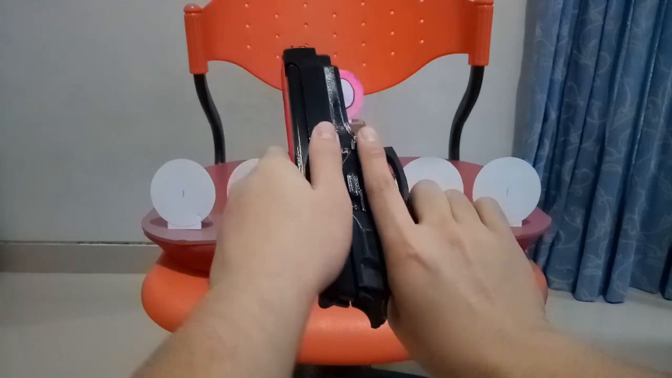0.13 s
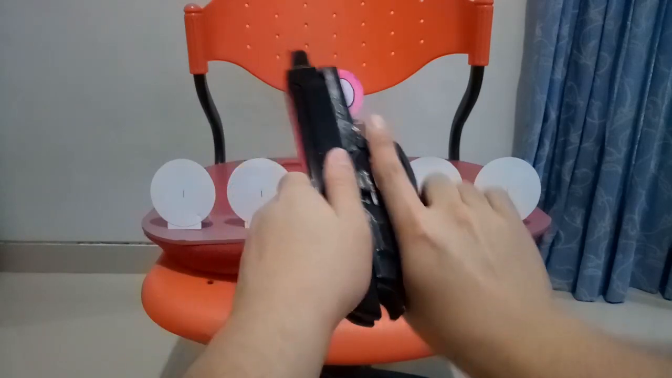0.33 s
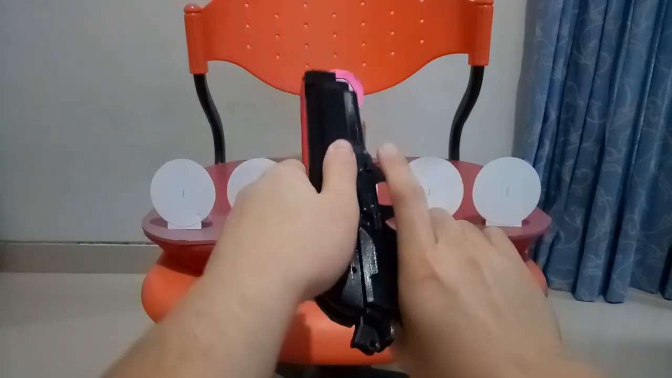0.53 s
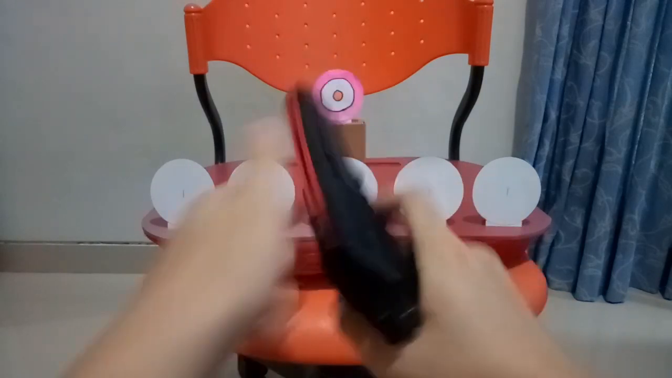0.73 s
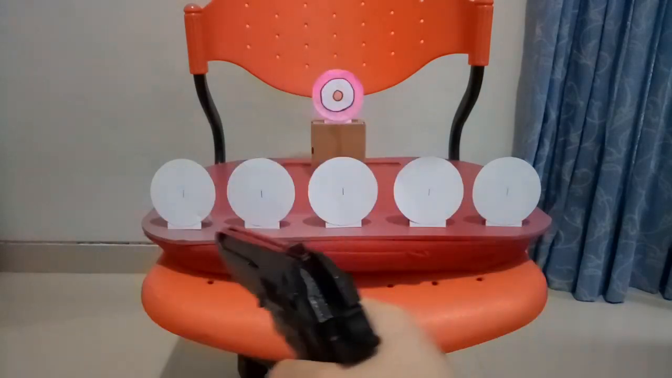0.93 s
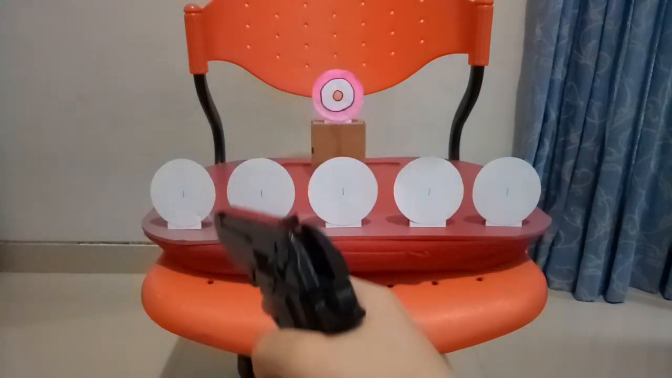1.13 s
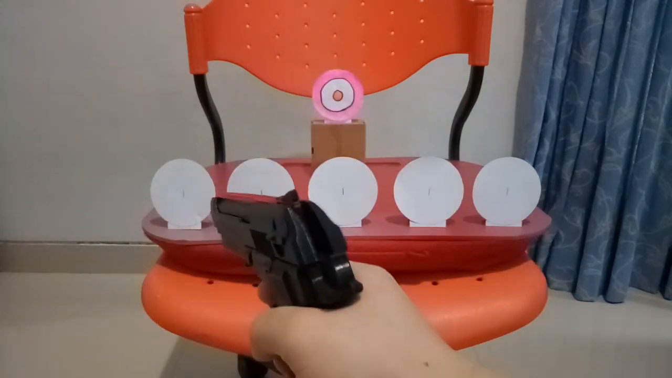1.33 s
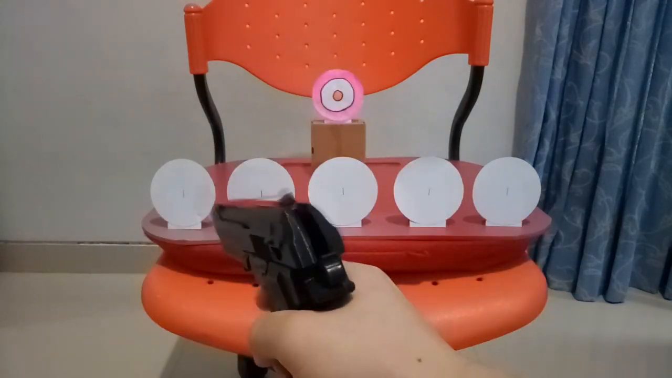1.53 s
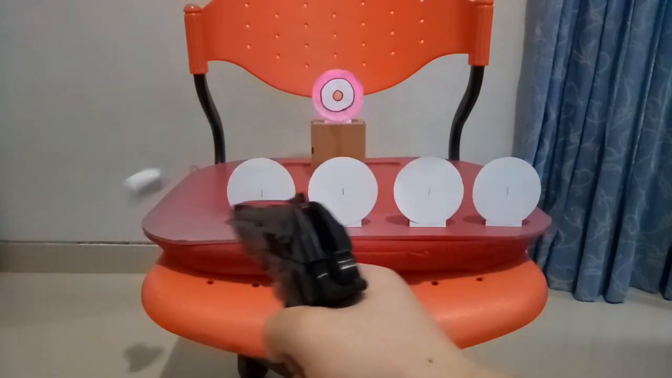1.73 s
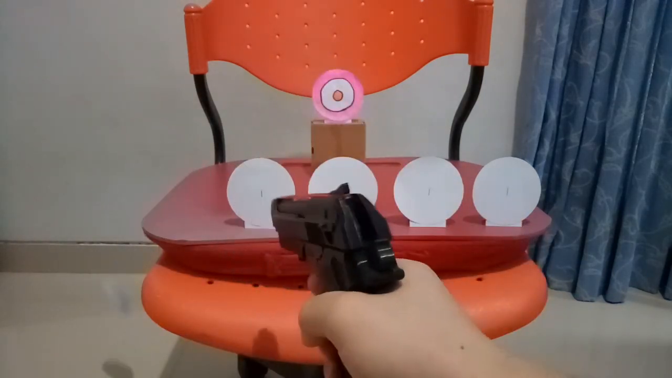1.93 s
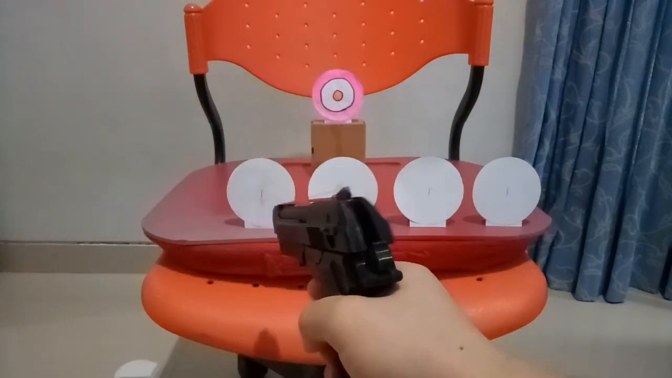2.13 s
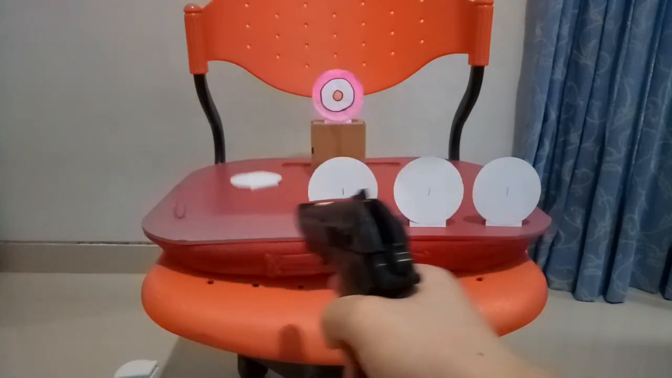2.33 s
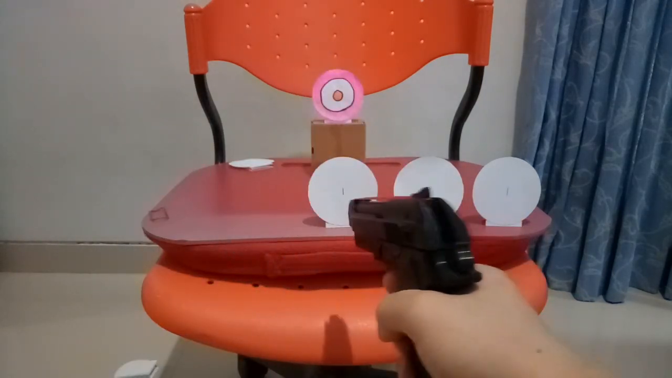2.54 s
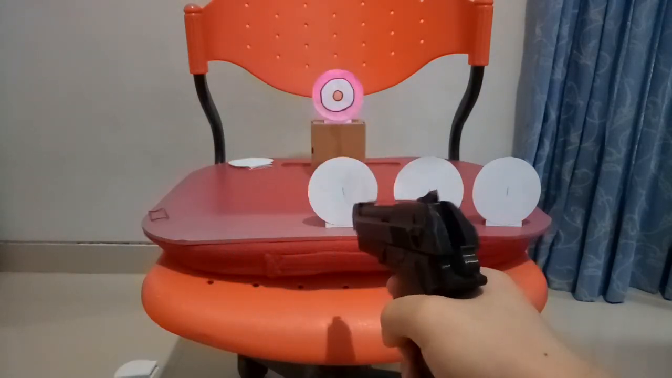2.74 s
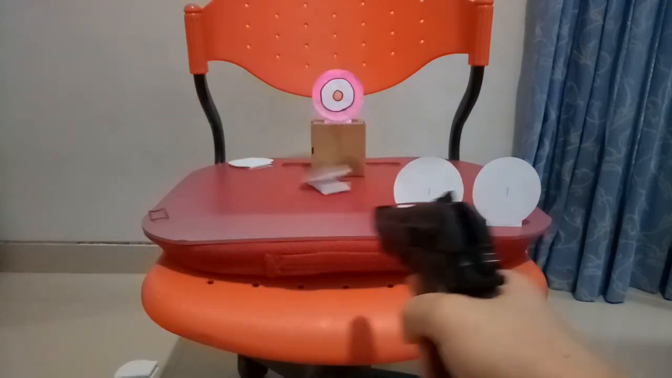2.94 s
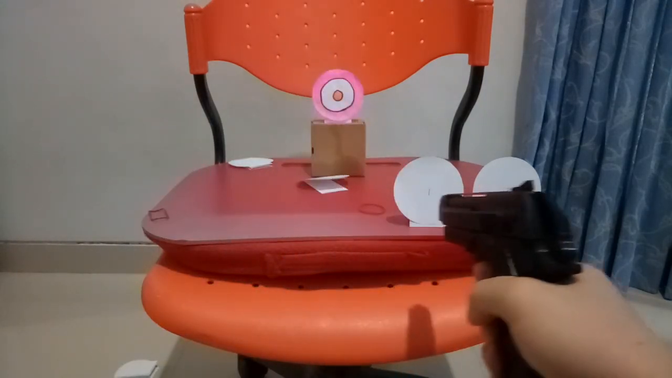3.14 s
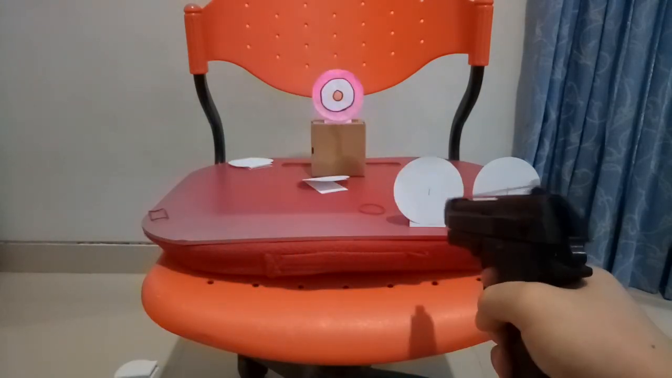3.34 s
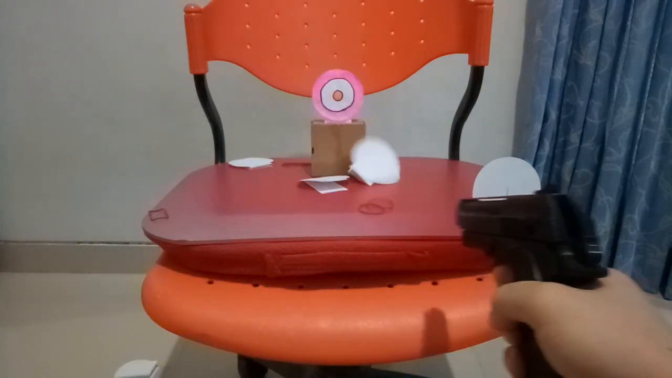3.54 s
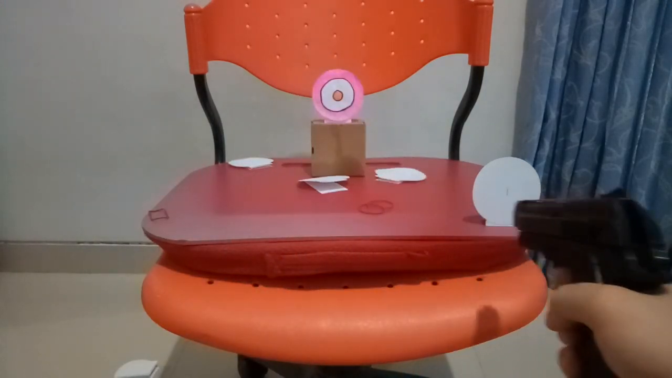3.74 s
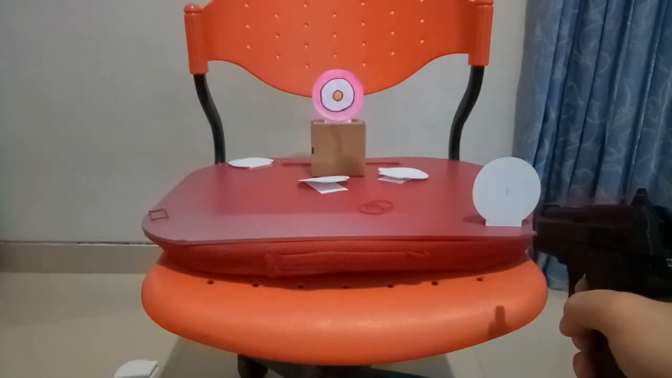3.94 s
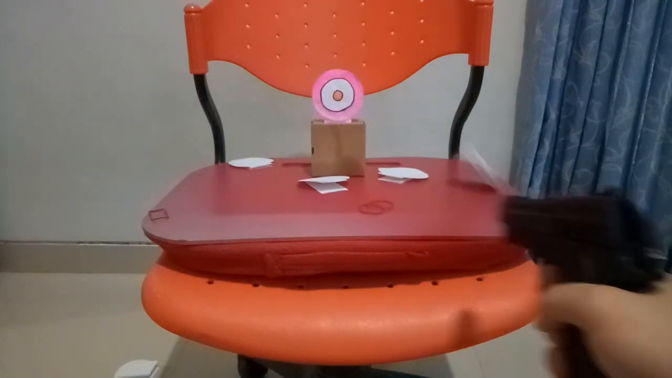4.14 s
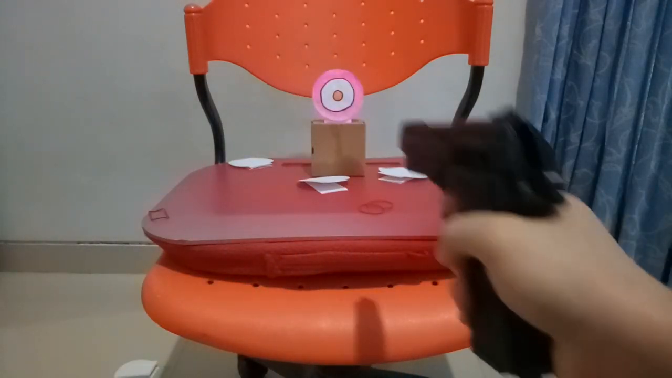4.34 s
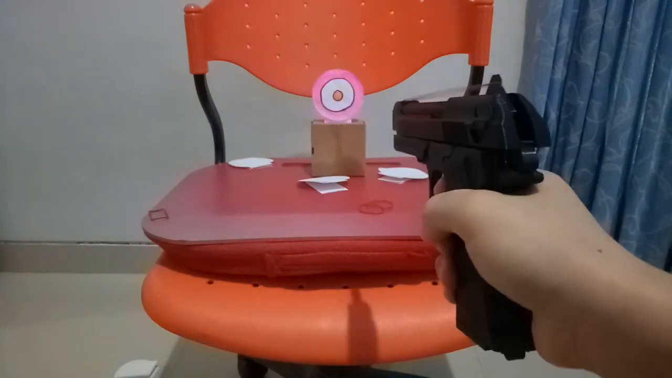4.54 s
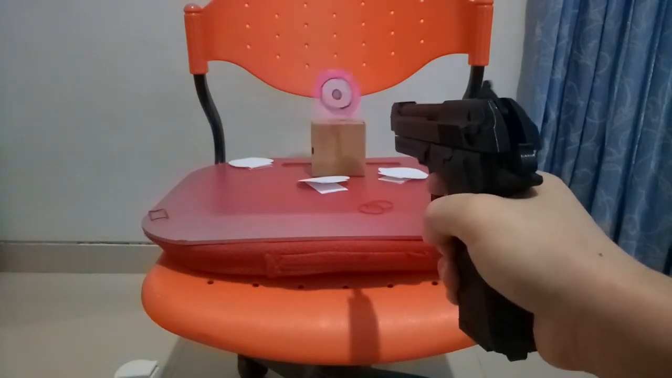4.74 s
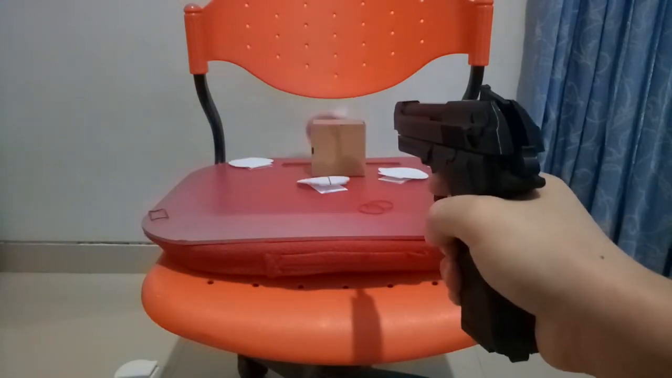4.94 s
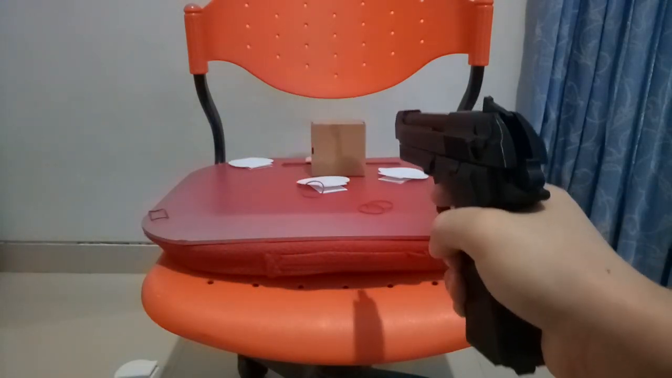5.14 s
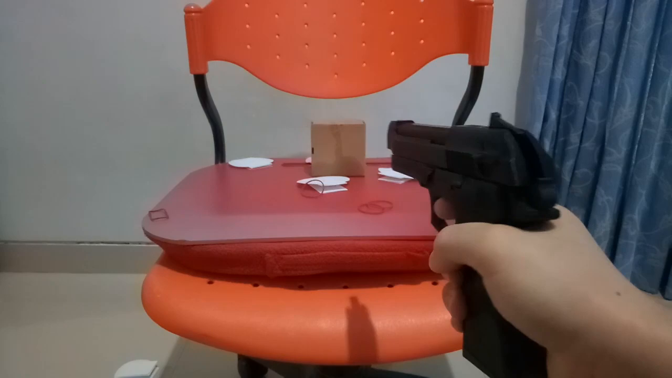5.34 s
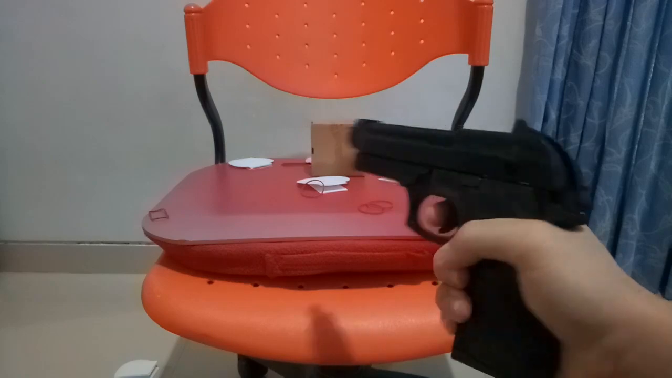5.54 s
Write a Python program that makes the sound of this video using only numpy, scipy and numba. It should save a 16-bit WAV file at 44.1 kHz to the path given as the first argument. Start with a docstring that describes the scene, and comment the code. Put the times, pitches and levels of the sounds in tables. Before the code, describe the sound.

A hollow plastic toy pistol is cocked with a double clack, then fired six times, each sharp snap answered by a return click and raspy echo.

```python
"""Toy pistol and card targets

A hollow plastic pistol is cocked, then fired six times close to a phone in a bare tiled room; the trigger clacks
back after each shot and light card targets land. Blows are damped modes plus a crack, each with a diffuse room tail;
puffs are decaying swings; creaks, squeaks, scrapes, rumble and room background are coloured noise.
The phone's gain control ducks under loud clacks, then lets go, so that the echo stands out as a rasp."""
import sys
import numpy as np
from scipy import signal
from scipy.fft import rfft, irfft, next_fast_len
from scipy.io import wavfile
from scipy.ndimage import uniform_filter1d, map_coordinates
from numba import njit

SR = 44100
rng = np.random.default_rng(int(sys.argv[2]) if len(sys.argv) > 2 else 0)


def unload_wav(signal):
    """Save mono or channel-first audio to the path in sys.argv[1] as 16-bit WAV at rate SR, clipped to [-1, 1]."""
    wavfile.write(
        sys.argv[1],
        SR,
        np.round(np.clip(np.atleast_2d(signal).T, -1, 1) * 32767).astype(np.int16),
    )


def decibels_to_gain(level_db):
    """Convert a level in decibels to a linear amplitude gain (20 dB per decade)."""
    exponent = np.asarray(level_db, float) / 20
    return 10 ** exponent


N = 246078  # length of the scene in samples
SIZE = 2 ** 15  # length of one blow with its room tail in samples

# Blows of the pistol: slide back and home, shots, trigger springing back, small catches in the mechanism.
# Each row: start in seconds, nominal energy level in dB, treble in dB, second knock in dB re the first, room in dB
# re the blow.
COCKING = [(.3996, 16, 1, -25, -4.5), (.5768, 28.5, -9, -1, -15)]
SHOTS = [(1.5423, 26.5, 1, -28, -6.5), (2.1449, 25.5, 5, -19.5, -5), (2.7473, 31.5, 0, -32, -11),
         (3.3649, 25, 4, -14, -8.5), (3.9982, 25.5, 2.5, -29.5, -7), (4.6320, 28.5, 1, -28, -10)]
TRIGGER_RETURNS = [(1.6787, 17, 6.2, -23, -4.5), (2.2813, 17.5, 8, -30, -4.5),
                   (2.8839, 24, 4.5, -33, -12.5), (3.5090, 23.5, 2.9, -3, -8), (4.1381, 21, 6, 0, -7.5),
                   (4.8136, 25.5, 4.7, -19, -13)]
CATCHES = [(.3737, -7, -16, -14, -4), (.5740, 10, 0, -13, -14), (1.2641, -24, -22, -12, -9),
           (2.907, 2, -8, -14, -14), (3.3254, -27, -19, -12, -8), (4.6090, -29, 6, -12, -10)]
# Card targets landing, each on its own face or edge. Each row: the five columns above, then the spectral slope
# below 4 kHz in dB per octave.
TARGET_FALLS = [(3.0024, -12.5, -10, -12, -12, 0), (3.1182, -7, -6, -5, -1, -1.2),
                (3.6510, -16.5, -8.5, -10, -9.5, -.4), (4.8558, 6.5, -20, -5, -9, -1.6),
                (5.1153, 3.5, -5, -14, -2, 3.6), (5.1276, 3, 10, -14, -8, 7),
                (5.2777, -30, -12, -10, -10, 3)]
# The same slope for the four kinds of pistol blow, in dB per octave.
COCKING_SLOPE_DB, SHOT_SLOPE_DB, RETURN_SLOPE_DB, CATCH_SLOPE_DB = 5.5, 7.5, 3.5, 2.5
# Puffs of air that reach the microphones. Each row: start in seconds, nominal level in dB.
PUFFS = [(0.576, -30), (1.5424, -31), (2.1454, -9.5), (2.7475, -2), (4.631, -30.5)]
# Modes of the plastic shell and of the card. Each row: nominal frequency in Hz, nominal level in dB,
# 60 dB decay time in seconds.
PLASTIC_MODES = [(1000, -25, .009), (1600, -19, .009), (2450, -11, .012), (3150, -8, .011),
                 (3660, -1, .016), (4300, -5, .011), (4780, -2, .014), (5550, -6, .011), (6100, -8, .011)]
CARD_MODES = [(900, -15, .016), (1500, -14, .01), (2450, -5, .012), (3200, -4, .011), (3800, 0, .013),
              (4600, -4, .011)]
# Colour of the crack at contact. Each row: frequency in Hz, relative level in dB.
CRACK_COLOUR = [(300, -20.5), (1500, -14.5), (4000, 13.5), (6500, -1.5), (8500, -29), (12000, -24.5),
                (15300, -20), (16500, -43)]
# Reverberation of the tiles. Each row: frequency in Hz, 60 dB decay time in seconds, relative level in dB.
TILES = [(200, 0.38, -9), (1060, 0.35, -7.5), (2500, 0.43, -8.5), (3180, 0.36, -5), (3666, 0.34, 0),
         (3980, 0.43, -4), (4630, 0.37, -3.5), (5300, 0.39, -11.5), (5950, 0.37, -14.5), (7400, 0.3, -30),
         (10100, 0.32, -40), (15000, 0.32, -47), (15700, 0.34, -70)]
# The action sweeps along the row of targets. Each row: time in seconds, left over right in dB,
# lag of the left in milliseconds.
SWEEP = [(.4, 2.5, 0.091), (2.3, 2, .1), (2.8, 3.5, .03), (3.4, 5.5, -0.078), (4.1, 7.5, -.14),
         (4.7, 5, -0.023), (5.1, 6, 0.058)]
# Swells of creak, rumble and scrape. Each row: peak in seconds, nominal peak level in dB, time to rise 20 dB
# in seconds, time to fall 20 dB in seconds.
CREAKS = [(1.345, -46, .1, .2), (3.52, -47, .01, .3), (3.66, -52, .1, .15), (4.15, -44, .01, 0.05),
          (4.22, -46, .06, 0.23)]
RUMBLES = [(4.255, -54, 0.13, 0.095)]
SCRAPES = [(.373, -42, .012, .04), (.394, -26, .016, 0.012), (.574, -16, .008, .003), (.834, -50, .05, .05),
           (1.35, -57, .18, .7)]
# Thin squeaks. Each row: the four columns of a swell, then pitch in Hz, width in Hz.
SQUEAKS = [(.832, -50, .06, .06, 1850, 200), (.97, -72, .15, .15, 1350, 30),
           (1.25, -70, .25, .06, 1550, 30), (1.27, -61, .015, .1, 815, 40)]
# Colours of the creak, the rumble, the scrape, the room background and the hiss of the electronics.
# Each row: frequency in Hz, relative level in dB (per Hz).
CREAK_COLOUR = [(100, -40), (250, -10.5), (320, 3), (450, -9.5), (700, -12), (810, 1), (950, -17),
                (1200, -8.5), (1600, -15), (4000, -11), (6500, -31), (9000, -67)]
RUMBLE_COLOUR = [(40, -26.5), (80, -6.5), (125, 22.5), (220, -8), (400, -33)]
SCRAPE_COLOUR = [(700, -38), (1500, -11), (1900, 0.5), (2400, -2.5), (3900, -1), (5200, -13.5), (7000, -26),
                 (9000, -63)]
FLOOR_COLOUR = [(12, -29.5), (20, -21.5), (74, 6.5), (146, -5.5), (285, -0.5), (446, -7.5), (485, -3.5),
                (590, -13.5), (1000, -8), (1370, -16), (1710, -7.5), (2020, -50.5), (4420, -41.5),
                (6180, -59.5), (16000, -36)]
HISS_COLOUR = [(800, -39.5), (2000, -8.5), (4300, -3.5), (6000, -26), (9000, -47.5)]
# Room background at the two ears. Each row: frequency in Hz, left-right likeness (limited to -1..1 in use).
FLOOR_LIKENESS = [(60, -0.66), (240, 0.86), (950, 0.83), (3770, -1.4), (15000, 0.02)]


def pistol():
    """Impact excitation: every part that strikes the hollow shell rings its modes; puffs of air are added."""
    kinds = [(COCKING, COCKING_SLOPE_DB), (SHOTS, SHOT_SLOPE_DB),
             (TRIGGER_RETURNS, RETURN_SLOPE_DB), (CATCHES, CATCH_SLOPE_DB)]
    rows = [(*row, slope_db) for table, slope_db in kinds for row in table]
    return blows(rows, PLASTIC_MODES, crack_db=5, chatter_s=0.0011) + puffs()


def puffs():
    """Damped oscillation: a quick pull and a slower push of air on both membranes, the swing slowing as it dies."""
    out, t = np.zeros(N), np.arange(SR // 10) / SR
    turns = 70 * t + .5 * (1 - np.exp(-t / .0015))  # phase in cycles, settling to 70 Hz
    for s, db in PUFFS:
        out[round(s * SR):][:len(t)] -= decibels_to_gain(db - 60 * t / .035) * np.sin(2 * np.pi * turns)
    return out * decibels_to_gain([[.5], [-.5]])


def targets():
    """Impact excitation: light card lands and rings briefly, with a shorter chatter than the pistol."""
    return blows(TARGET_FALLS, CARD_MODES, crack_db=3.5, chatter_s=0.00053)


def blows(rows, modes, crack_db, chatter_s):
    """Superposition: each blow chatters, rings the modes, cracks, may knock again, and fills the room."""
    out, t, hz = np.zeros((2, N + SIZE)), np.arange(2048) / SR, np.fft.rfftfreq(SIZE, 1 / SR)
    crack_colour = causal(along(CRACK_COLOUR, hz))
    room_colour = decibels_to_gain(along(TILES, hz, column=2))
    octaves = np.log2(np.clip(hz, 100, 4000) / 4000)  # zero from 4 kHz up, negative below
    thin_db = -12 * np.log2(np.clip(700 / (hz + 20), 1, None))  # a small object sends out no bass
    again_s = .0126  # the second knock is a little duller
    lead_s = .0003  # room for either ear to come first
    when, *place = np.transpose(SWEEP)
    for s, db, treble_db, again_db, room_db, slope_db in rows:
        pan_db, lag_ms = (np.interp(s, when, column) for column in place)
        ring = ringing(modes, t)
        crack = decibels_to_gain(crack_db - 60 * t / .004) * rng.standard_normal((2, len(t)))
        tone_db = slope_db * octaves + treble_db * np.clip(hz / 4200 - 1, 0, 1)
        source = rfft(ring, SIZE) * chatter(chatter_s, hz) + rfft(crack, SIZE) * crack_colour
        blow = source * causal(tone_db - 4 * octaves + thin_db)
        blow = blow / np.sqrt(np.mean(np.abs(blow) ** 2, axis=1, keepdims=True))
        lags = np.array([delay(lead_s + lag_ms / 2000, hz), delay(lead_s - lag_ms / 2000, hz)])
        ears = decibels_to_gain([[pan_db / 2], [-pan_db / 2]]) * lags
        again = decibels_to_gain(again_db) * delay(again_s, hz) / (1 + (hz / 9000) ** 2)
        room = decibels_to_gain(room_db) * room_tail(room_colour * decibels_to_gain(tone_db) * banded(hz))
        sound = blow * ears * (1 + again) + room
        out[:, round((s - lead_s) * SR):][:, :SIZE] += decibels_to_gain(db) * irfft(sound, SIZE)
    return out[:, :N]


def ringing(modes, t):
    """Modal synthesis: a sum of damped sines, slightly different in pitch at each blow and in level at each ear."""
    ring = 0
    for hz, db, t60 in modes:
        decay = decibels_to_gain(db + rng.normal(0, 2.7, (2, 1)) - 60 * t / t60)
        ring = ring + decay * np.sin(2 * np.pi * hz * rng.normal(1, 0.011) * t)
    return ring * (1 - np.exp(-t / .0009))  # soft onset


def chatter(spacing_s, hz):
    """Repeated contact: three rebounds of random sign follow, the first as strong as the touch, the next two weaker."""
    rebounds = [decibels_to_gain(-2 * k) * rng.choice([-1, 1]) * delay(spacing_s * (k + rng.random()), hz) for k in range(3)]
    return 1 + sum(rebounds)


def room_tail(gain):
    """Diffuse reverberation: a fresh tail per ear starts after the first walls; each frequency dies at its own speed."""
    f, t, z = signal.stft(rng.standard_normal((2, SIZE - 4096)), SR, nperseg=256)
    decay = decibels_to_gain(-60 * t / along(TILES, f)[:, None])
    tail = signal.istft(z * decay, SR, nperseg=256)[1][:, :SIZE - 4096]
    t = np.arange(tail.shape[1]) / SR
    tail = tail * np.clip((t - .006) / 0.0036, 0, 1)
    flutter = map_coordinates(rng.standard_normal(400), [t * 300])  # early reflections arrive in clumps
    tail = tail * decibels_to_gain(2.6 * flutter * np.exp(-t / .1))
    tail[1] = 0.13 * tail[0] + 0.97 * tail[1]  # the ports are close, so the tails are partly alike
    return unit(rfft(tail, SIZE) * gain) * decibels_to_gain([[1.5], [-1.5]])


def banded(hz):
    """Uneven bands: a random gain with a new value every 90 Hz makes each tail streaky."""
    return decibels_to_gain(3.5 * map_coordinates(rng.standard_normal(500), [np.minimum(hz / 90, 498)]))


def causal(gain_db):
    """Minimum phase: the folded cepstrum gives this gain a response with nothing before the blow."""
    cepstrum = irfft(np.log(decibels_to_gain(gain_db)), SIZE)
    cepstrum[1:SIZE // 2] *= 2
    cepstrum[SIZE // 2 + 1:] = 0
    return np.exp(rfft(cepstrum))


def delay(s, hz):
    """Shift theorem: a delay in seconds is a phase that grows with frequency."""
    return np.exp(-2j * np.pi * hz * s)


def handling():
    """Friction: seat and arm shift with a low creak and a rumble; slide and trigger scrape as they travel."""
    creak = grainy(noise(CREAK_COLOUR, [(300, 0.91), (3000, 0.17)]), rate=79, depth_db=2.0)
    rumble = noise(RUMBLE_COLOUR, [(100, 0.83)]) * decibels_to_gain([[3], [-3]])
    scrape = grainy(noise(SCRAPE_COLOUR, [(2000, 0.36)]), rate=220, depth_db=2.2) * decibels_to_gain([[3], [0]])
    # the trigger scrapes louder up to 9 ms before each shot
    pulls = [(s - .009, -52.5, .06, .004) for s, *_ in SHOTS]
    moving = swells(CREAKS) * creak + swells(RUMBLES) * rumble + swells([*SCRAPES, *pulls]) * scrape
    return moving + squeaks()


def squeaks():
    """Narrow-band noise: each squeak is a thin band around a pitch that swells and fades."""
    out = np.zeros((2, N))
    for *swell, hz, width_hz in SQUEAKS:
        band = [(hz - 3 * width_hz, -40), (hz - width_hz / 2, 0), (hz + width_hz / 2, 0), (hz + 3 * width_hz, -40)]
        out += swells([swell]) * noise(band, [(hz, .6)])
    return out


def grainy(x, rate, depth_db):
    """Stick and slip: the level wanders unevenly through about rate random values a second."""
    level_db = depth_db * map_coordinates(rng.standard_normal(4000), [np.arange(N) / SR * rate])
    return unit(x * decibels_to_gain(level_db))


def swells(rows):
    """Exponential envelope: the gain of swells that rise and fall steadily in dB."""
    t = np.arange(N) / SR
    return sum(decibels_to_gain(db - 20 * np.maximum((s - t) / rise, (t - s) / fall)) for s, db, rise, fall in rows)


def room_background():
    """Stationary noise: the quiet hum of the room, a little stronger on the left."""
    return decibels_to_gain(-66.5) * noise(FLOOR_COLOUR, FLOOR_LIKENESS) * decibels_to_gain([[1.2], [-1.2]])


def noise(spectrum, alike):
    """Filtered noise: stereo of rms 1 with a colour, a left-right likeness and narrow streaks that come and go."""
    z = signal.stft(rng.standard_normal((2, N)), nperseg=1024)[2]
    field = uniform_filter1d(rng.standard_normal(z.shape[1:]), size=2, axis=0)
    field = uniform_filter1d(field, size=14, axis=1)
    streaked = signal.istft(z * decibels_to_gain(3.2 * unit(field)), nperseg=1024)[1][:, :N]
    size = next_fast_len(N)
    hz = np.fft.rfftfreq(size, 1 / SR)
    # the balance of mid and side sets the correlation of the ears
    turn = np.arccos(np.clip(along(alike, hz), -1, 1)) / 2
    mid, side = rfft(streaked, size) * decibels_to_gain(along(spectrum, hz)) * [np.cos(turn), np.sin(turn)]
    return unit(irfft(np.array([mid + side, mid - side]), size)[:, :N])


def along(points, hz, column=1):
    """Logarithmic frequency scale: interpolates a column of (Hz, values) points."""
    table = np.transpose(points)
    return np.interp(np.log(hz + 1), np.log(table[0] + 1), table[column])


def unit(x):
    """Normalisation: scales to rms 1."""
    return x / np.sqrt(np.mean(np.abs(x) ** 2) + 1e-20)


def scene():
    """Superposition of pistol, targets, handling and room background."""
    return pistol() + targets() + handling() + room_background()


@njit
def glide(goal_db, attack, release):
    """First-order smoothing: the cut approaches its goal, with one rate for rising and one for falling."""
    out = goal_db.copy()
    for i in range(1, len(out)):
        rate = attack if goal_db[i] > out[i - 1] else release
        out[i] = out[i - 1] + (goal_db[i] - out[i - 1]) * rate
    return out


def gain_control(x):
    """Compression: one cut per 20 ms block from the power in all of it, so it ducks ahead of a late clack."""
    block = (np.arange(N) + round(.005 * SR)) // round(.02 * SR)
    power = np.bincount(block, np.mean(x ** 2, axis=0)) / np.bincount(block)
    goal_db = 0.5 * np.maximum(10 * np.log10(power + 1e-12) + 36, 0)  # half the excess over -36 dB
    attack_s, release_s = 0.005, 0.0034
    return x * decibels_to_gain(-glide(goal_db[block], 1 / (attack_s * SR), 1 / (release_s * SR)))


def top_cut(x):
    """Nothing passes above the cut-off."""
    return signal.sosfilt(signal.butter(12, 16410, fs=SR, output="sos"), x)


def record(dry):
    """Signal chain of the phone: gain control, hiss of the electronics, soft clipping and a band limit."""
    x = gain_control(dry)
    x = x + decibels_to_gain(-65.0) * noise(HISS_COLOUR, [(3000, 0.14)])
    x = x / (1 + np.abs(x) ** 8) ** (1 / 8)
    x = signal.sosfilt(signal.butter(8, 15800, fs=SR, output='sos'), x)
    return top_cut(x)


dry = scene()
out = record(dry)
unload_wav(out)
```